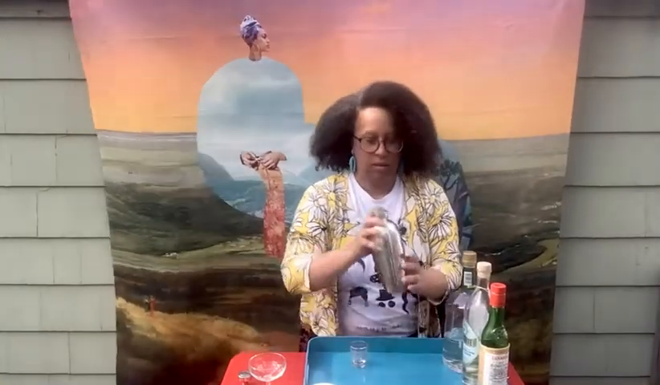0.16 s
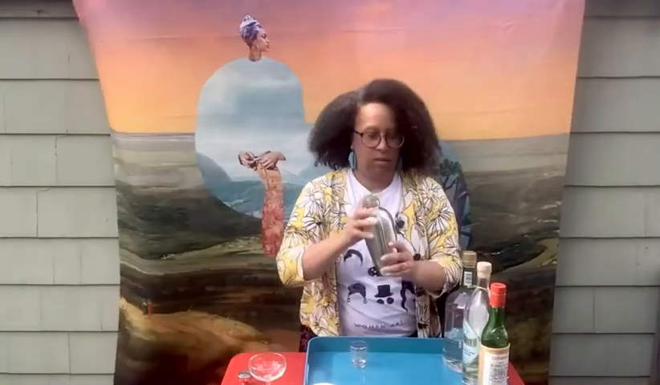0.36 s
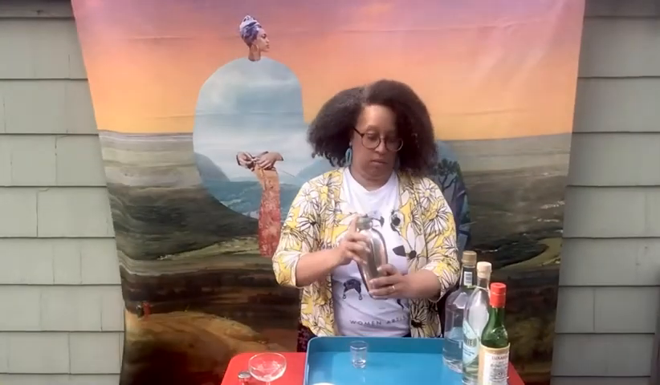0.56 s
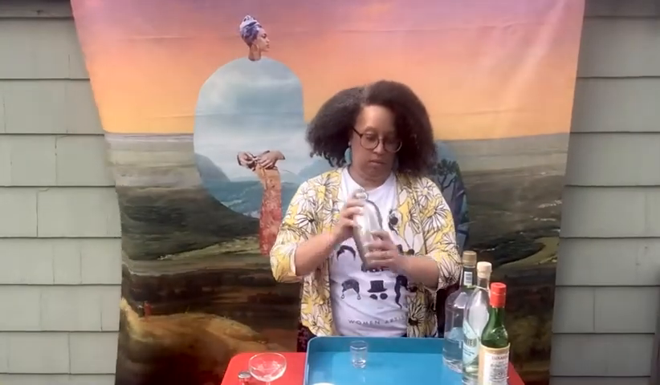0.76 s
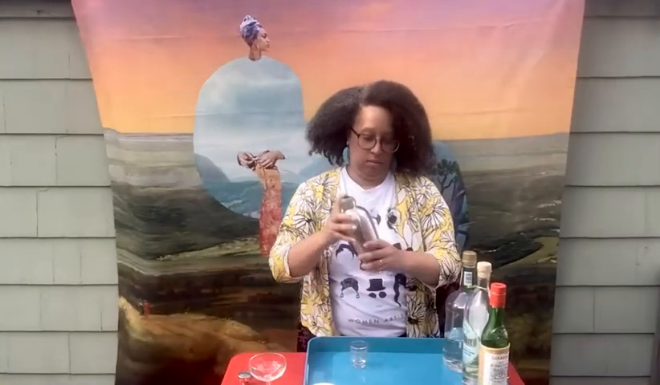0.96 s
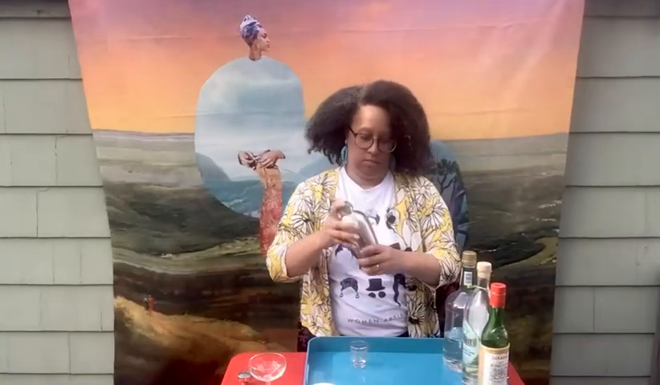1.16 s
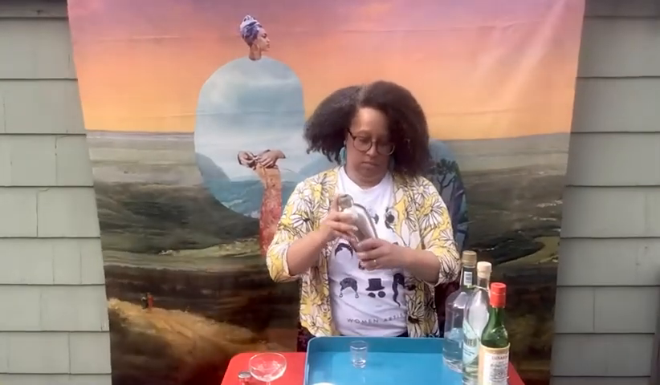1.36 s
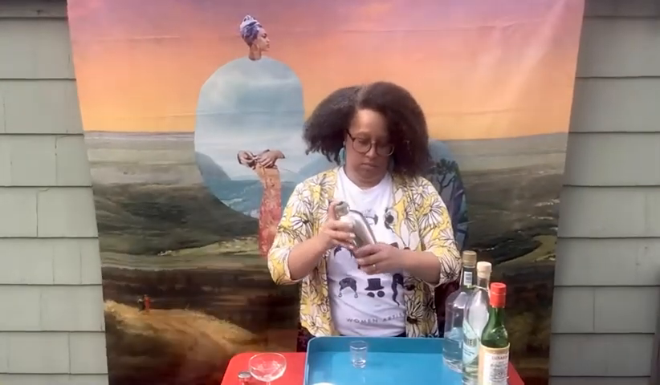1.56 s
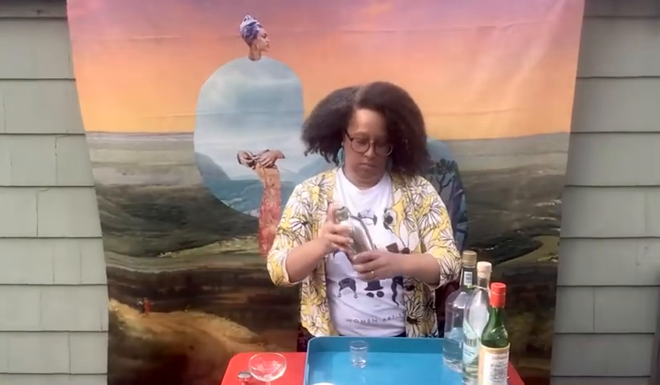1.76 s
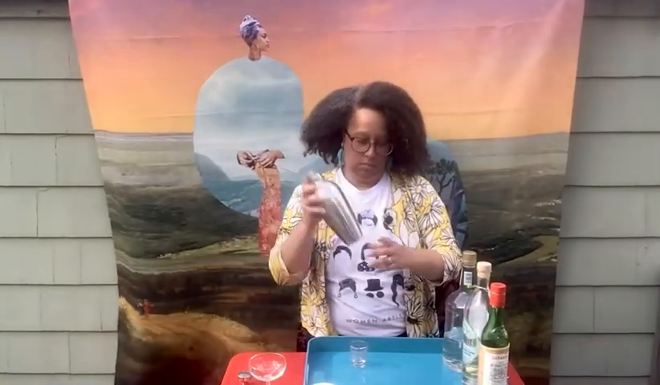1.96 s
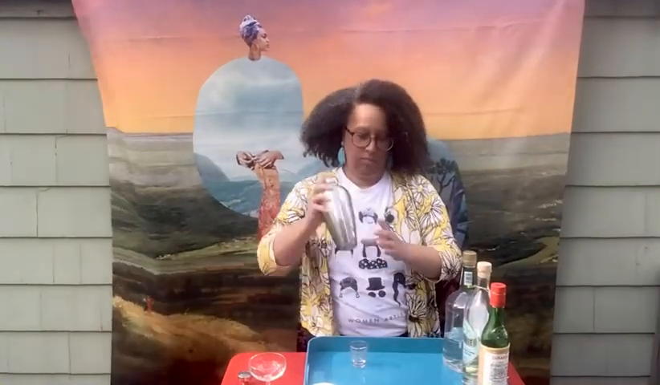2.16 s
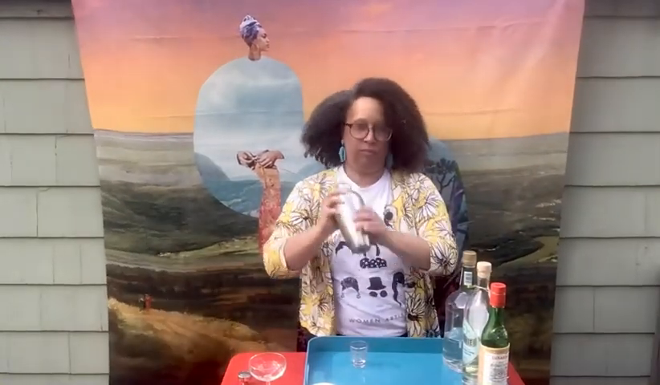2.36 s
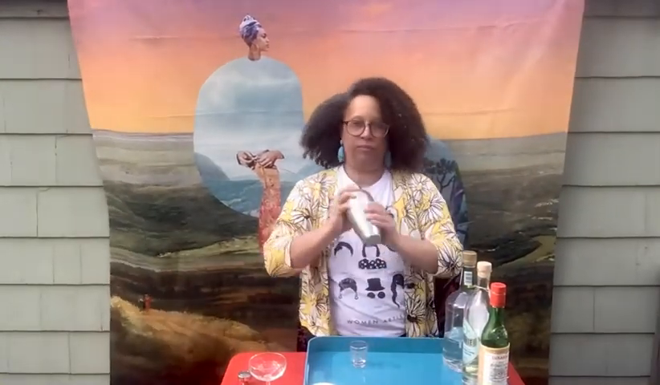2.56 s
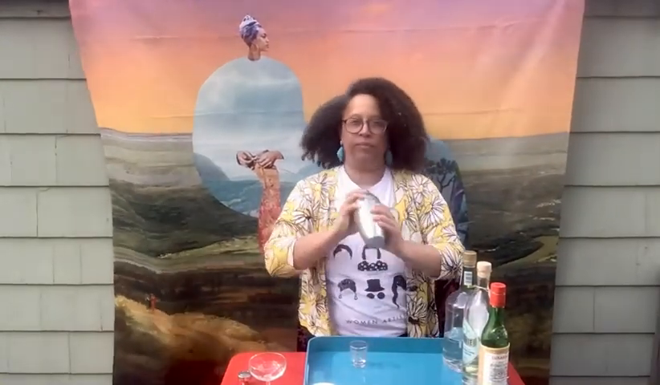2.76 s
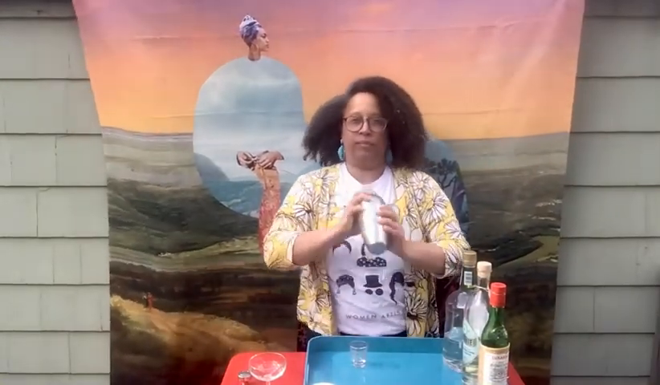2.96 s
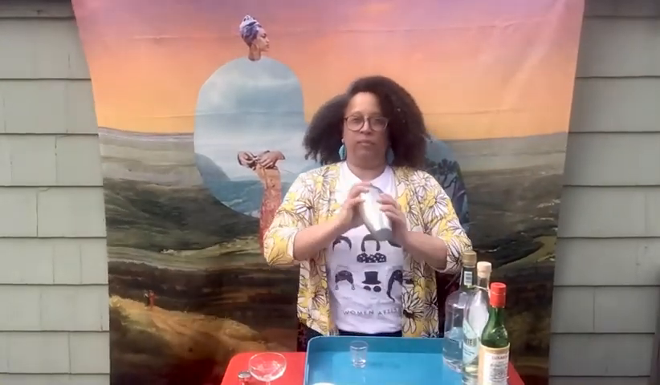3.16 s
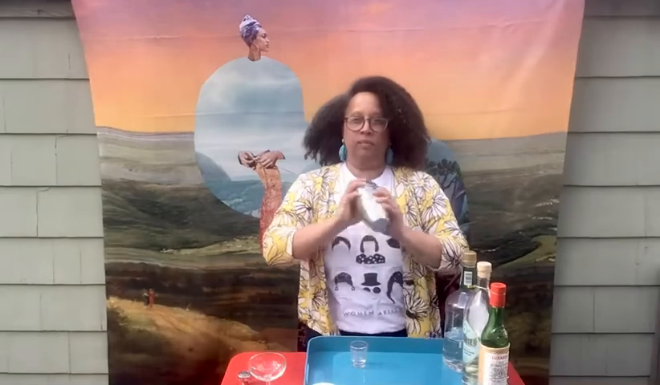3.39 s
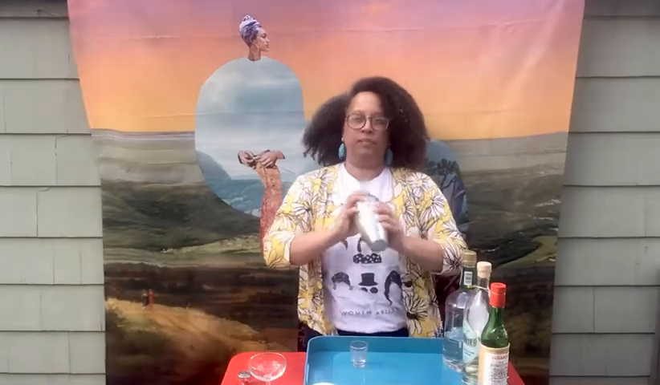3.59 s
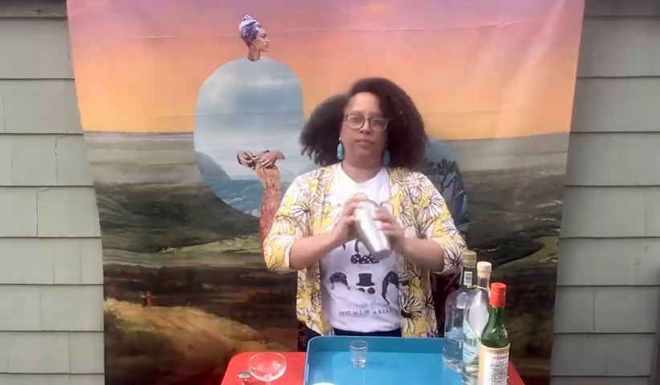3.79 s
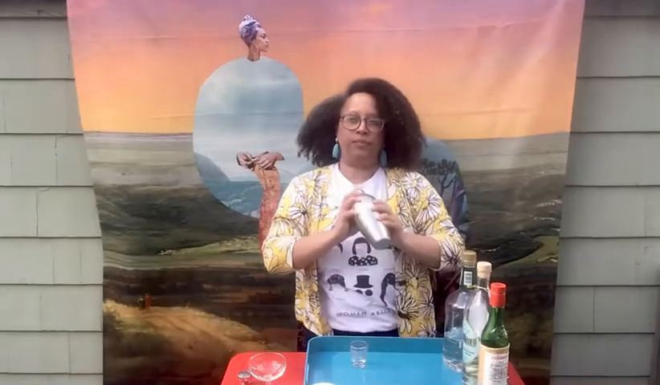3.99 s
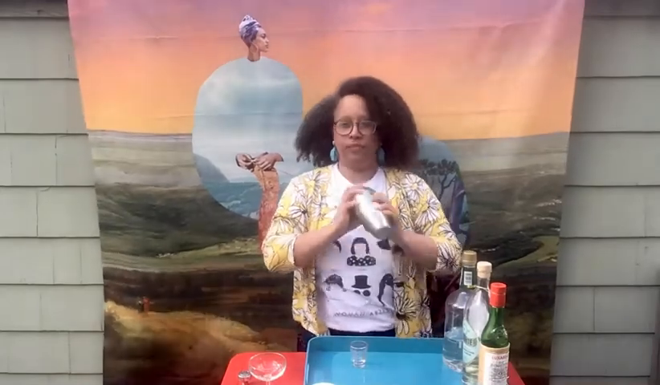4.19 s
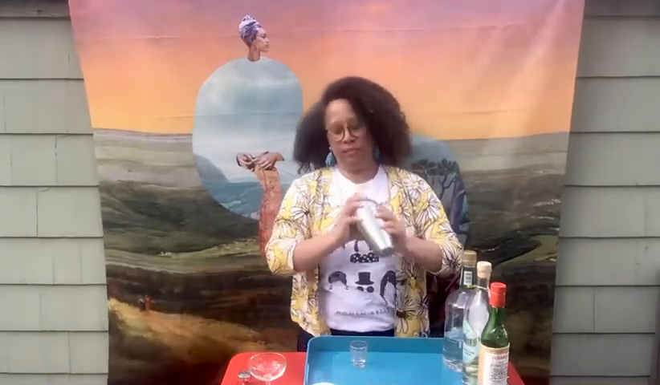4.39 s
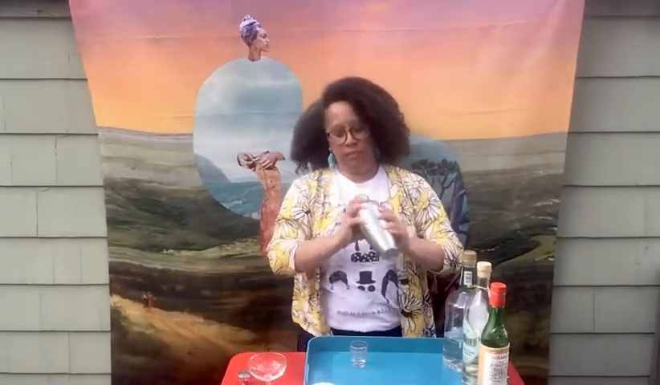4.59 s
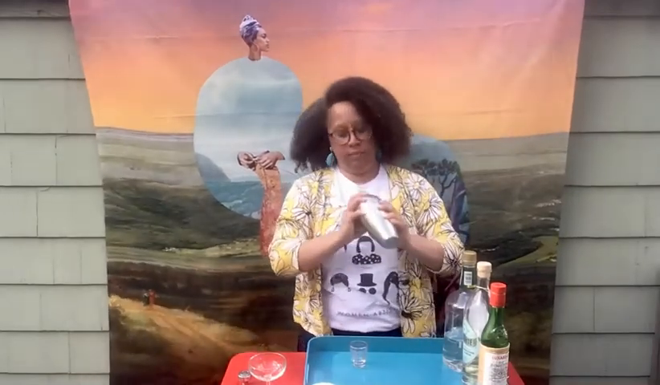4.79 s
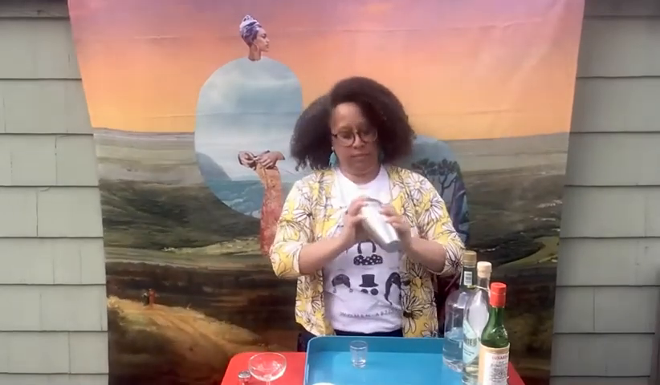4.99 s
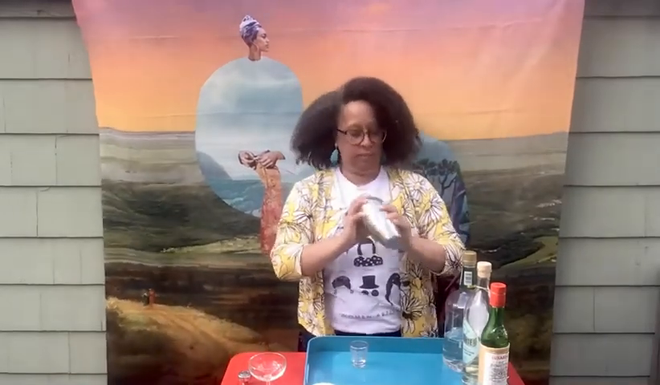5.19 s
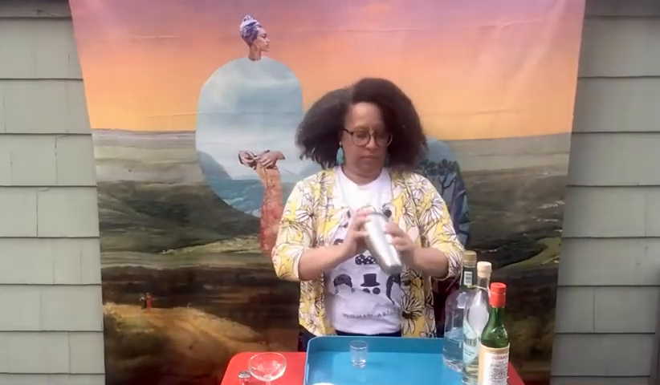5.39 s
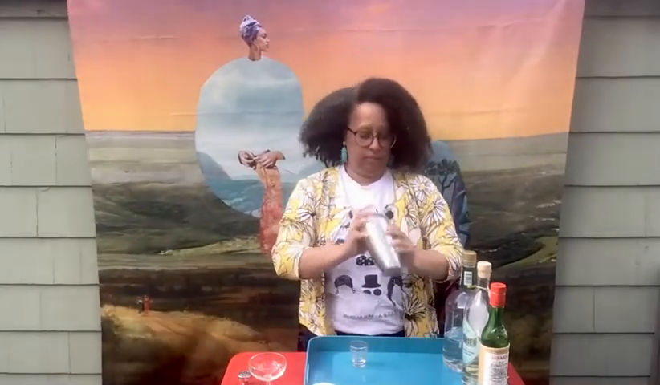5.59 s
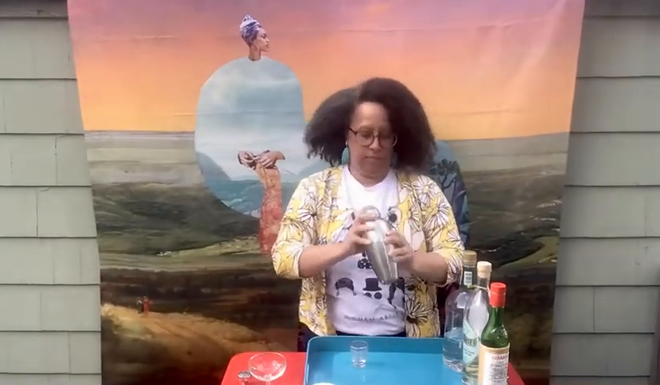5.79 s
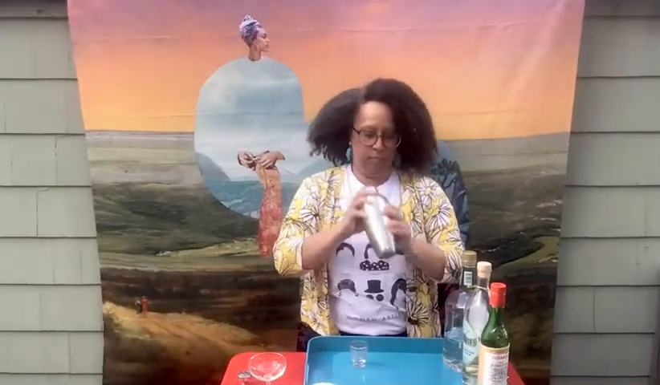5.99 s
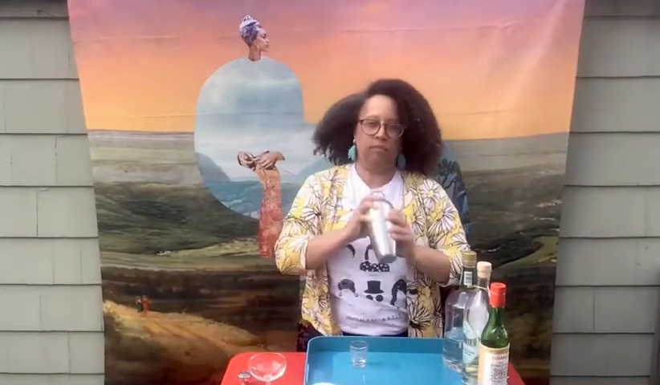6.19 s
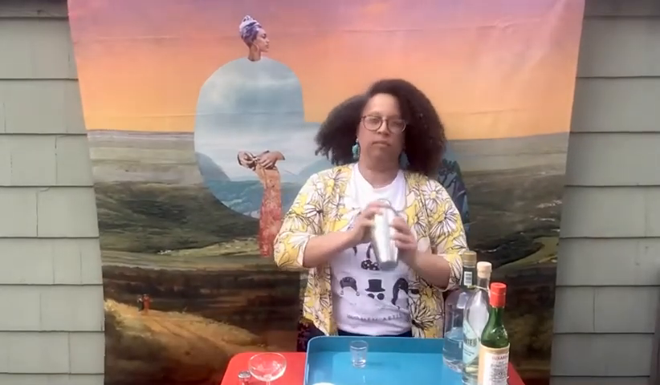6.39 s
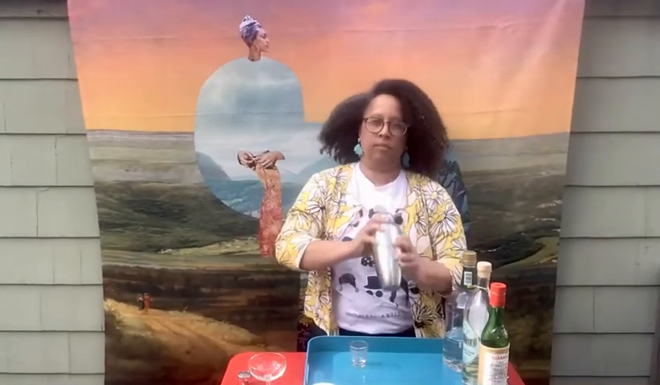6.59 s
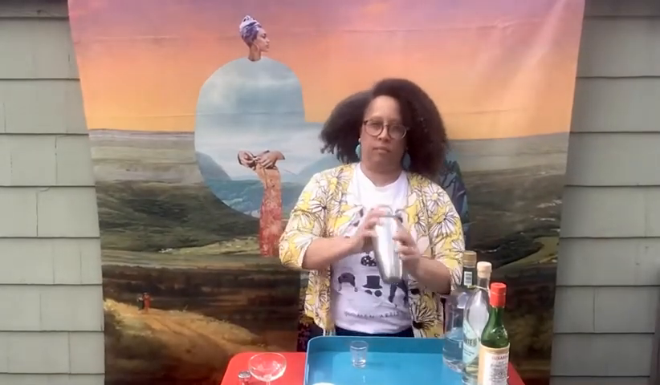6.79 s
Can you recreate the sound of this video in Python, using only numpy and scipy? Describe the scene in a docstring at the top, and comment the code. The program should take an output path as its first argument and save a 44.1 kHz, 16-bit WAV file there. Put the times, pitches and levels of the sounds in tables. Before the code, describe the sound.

A quiet outdoor yard with low, distant traffic rumble, faint hums and a little wind. A small bird gives a thin, zigzag falling chirp at 0.15 s and again, weaker, at 1.5 s; a faint reedy call comes at 1.9 s. From 0.3 to 0.6 s ice cubes shift softly in a steel shaker, with dull clinks again from 0.8 to 1.05 s and tiny ones until 1.45 s. At about 2.03 s the shaking bursts in, first with a more ringing metal tone, one loud crack near 2.07 s, then settling by 2.4 s. Until the end near 7 s, ice flies end to end, five round trips a second: bright clattering landings alternate with duller, cupped ones, each with short damped ring, scattered bounces, thump and liquid hiss. Blows grow stronger, with piercing cracks around 4.5, 4.7, 6.4 and 6.8 s. Close, dry sound, slight wall reflection.

```python
"""Outdoors by a wall: ice cubes shift in a steel shaker, then are thrown end to end and back five times a second.
Each blow cracks, rings damped shell modes and the cube's own pitch, and sets off dying random bounces.
Each turn adds a swell of filtered clicks (clatter), a thump and a hiss of drink.
Behind: traffic rumble and hums from shaped noise, low wind, small birds as wavering sines."""
import sys
import numpy as np
from scipy import signal
from scipy.io import wavfile

SR = 44100
rng = np.random.default_rng(int(sys.argv[2]) if len(sys.argv) > 2 else 0)


def transcribe(signal):
    """Save signal, clipped to [-1, 1], as a 16-bit WAV file at the path in sys.argv[1]."""
    frames = np.atleast_2d(signal).T
    limited = np.clip(frames, -1, 1)
    pcm = np.round(limited * 32767).astype(np.int16)
    wavfile.write(sys.argv[1], SR, pcm)


N = 302085


def from_db(db):
    """Amplitude gain of a level in dB."""
    return 10 ** (np.asarray(db) / 20)


def rms_one(x):
    """Scale to rms 1."""
    return x / np.sqrt(np.mean(x ** 2) + 1e-20)


def filtered(x, order, hz, kind):
    """Butterworth filter: low, high or band."""
    return signal.sosfilt(signal.butter(order, hz, kind, fs=SR, output="sos"), x)


def drift(rate_hz):
    """Random wander of rms 1: noise through two one-pole lowpasses, made at SR / 40 and interpolated."""
    pole = np.exp(-2 * np.pi * rate_hz * 40 / SR)
    noise = rng.standard_normal(N // 40 + 2002)
    slow = signal.lfilter([1], [1, -2 * pole, pole * pole], noise)[2000:]   # settled part
    return np.interp(np.arange(N) / 40, np.arange(len(slow)), rms_one(slow))


def ring(clicks, hz, t60_s):
    """Two-pole resonator: a unit click starts a dying sine of height about 1."""
    radius = from_db(-60 / (t60_s * SR))
    angle = 2 * np.pi * hz / SR
    return signal.lfilter([0, np.sin(angle)], [1, -2 * radius * np.cos(angle), radius ** 2], clicks + 1e-18)


def fade(clicks, t60_s):
    """Envelope that jumps at each click and decays exponentially."""
    return signal.lfilter([1], [1, -from_db(-60 / (t60_s * SR))], clicks + 1e-18)


def grains(per_s, spread_db):
    """Random clicks of uneven size and sign; rms 1."""
    sizes = from_db(spread_db * np.minimum(rng.exponential(1, N), 4))
    signs = rng.choice([-1, 1], N)
    return rms_one(sizes * signs * (rng.random(N) < per_s / SR))


def banded(sources, spectrum, patchy_db, rate_hz):
    """Third-octave bands dealt in turn from two sources, each with its own level and flicker; rms 1."""
    edges_hz = 25 * 2 ** np.arange(0, 9.5, 1 / 3)
    hz, density_db = np.transpose(spectrum)
    out = 0
    for k, (low_hz, high_hz) in enumerate(zip(edges_hz, edges_hz[1:])):
        band = filtered(sources[k % 2], 2, [low_hz, high_hz], "band")
        level_db = np.interp(np.log(low_hz * high_hz) / 2, np.log(hz), density_db)
        out = out + band * from_db(level_db + patchy_db * drift(rate_hz))
    return rms_one(out)


# relative spectrum of the rumble: pitch_hz, density_db [dB per Hz]
RUMBLE_SPECTRUM = [(26, -34), (45, -3.5), (228, -7), (299, -12), (363, -25), (513, -18), (818, -22),
                   (1550, -26.5), (1840, -31.5), (2410, -32), (12500, -45), (16000, -51)]
# far machinery: pitch_hz, width_hz, level_db
HUMS = [(102.5, 13.4, -64.5), (236.4, 5, -66.5), (488, 3.4, -91), (384, 27, -68.5)]
RUMBLE_DB = -59.5


def outdoors():
    """Distant traffic as shaped noise with a faint flicker; slowly wavering hums as noise through resonators."""
    noises = rng.standard_normal((2, N))
    air = from_db(RUMBLE_DB) * banded(noises, RUMBLE_SPECTRUM, patchy_db=-0.5, rate_hz=9)
    for hz, width_hz, level_db in HUMS:
        hum = rms_one(ring(rng.standard_normal(N), hz, 1.64 / width_hz))
        air += from_db(level_db + 1.2 * drift(1.0)) * hum
    return air


# one low bump: centre_s, pitch_hz, half_length_s, peak_db
BUMP = (3.39, 68, .012, -41)
WIND_DB = -73.5


def wind():
    """Lumpy low gusts on the microphone as 42-75 Hz noise, and one short bump: a cosine in a bell envelope."""
    low = rms_one(filtered(rng.standard_normal(N), 2, [42, 75], "band"))
    centre_s, hz, half_length_s, peak_db = BUMP
    after_s = np.arange(N) / SR - centre_s
    bump = from_db(peak_db) * np.exp(-(after_s / half_length_s) ** 2) * np.cos(2 * np.pi * hz * after_s)
    return from_db(WIND_DB + 3.2 * drift(5.6)) * low + bump


def bird(call, overtones_db, warble):
    """Harmonics on a pitch curve with a quick random waver in pitch and level, softly started and stopped."""
    s, hz, level_db = np.transpose(call)
    t = np.arange(N) / SR
    pitch_hz = np.interp(t, s, hz) * (1 + warble * drift(88.7))
    phase = 2 * np.pi * np.cumsum(pitch_hz) / SR
    edge = np.clip(np.minimum(t - s[0], s[-1] - t) / 0.0072, 0, 1)
    tone = sum(from_db(db) * np.sin((k + 1) * phase) for k, db in enumerate(overtones_db))
    return np.sqrt(2) * tone * edge * from_db(np.interp(t, s, level_db) + 4 * drift(150))


# zigzag falling chirp: after_start_s, pitch_hz
CHIRP_PITCH = [(0, 3500), (.019, 4800), (.033, 3700), (.04, 4150), (.048, 3100), (.058, 3400), (.085, 3250),
               (.1, 2800), (.122, 2900)]
CHIRP_DB, CHIRP_SWELL_DB, CHIRP_LOUDEST_S, CHIRP_HALF_S = -67, 7, 0.063, .065


def chirp(start_s, offset_db):
    """Time, pitch and level curve of one chirp, swelling towards its middle."""
    s, hz = np.transpose(CHIRP_PITCH)
    below_peak_db = CHIRP_SWELL_DB * ((s - CHIRP_LOUDEST_S) / CHIRP_HALF_S) ** 2
    return np.transpose([start_s + s, hz, offset_db + CHIRP_DB - below_peak_db])


# chirps: start_s, offset_db
CHIRPS = [(0.147, 0), (1.505, -2.5)]
# thin note before each chirp: after_chirp_start_s, pitch_hz, level_db
LEAD_IN = [(-.017, 5650, -82), (-.008, 5750, -76), (0, 5700, -82)]
# fainter reedy call: time_s, pitch_hz, level_db
REEDY = [(1.85, 2450, -86), (1.9, 2300, -74), (1.98, 2240, -90)]
# harmonics of the reedy call, fundamental first: level_db
REEDY_OVERTONES_DB = [-2, -3, -11]
# smear of the far calls: lag_s, level_db
YARD_ECHOES = [(.011, -10), (.023, -13), (.037, -17)]


def birds():
    """Chirps with lead-in notes and one reedy call, smeared by yard echoes."""
    calls = bird(REEDY, REEDY_OVERTONES_DB, warble=.025)
    for start_s, offset_db in CHIRPS:
        calls += bird(np.add(LEAD_IN, [start_s, 0, offset_db]), [0], warble=.01)
        calls += bird(chirp(start_s, offset_db), [0], warble=0.03)
    return calls + sum(from_db(db) * np.roll(calls, round(lag_s * SR)) for lag_s, db in YARD_ECHOES)


# distinct blows of ice on steel, before the mix gain:
# start_s, peak_db, brightness_db [relative to the peak], cube_pitch_hz
BLOWS = [(0.313, -41, -7, 2560), (0.358, -42, -22, 2040), (.38, -35.5, -24, 2230), (.428, -53, 2, 6100),
         (0.445, -40, -3, 6900), (.477, -47, -8, 2260), (0.489, -43, -7, 2080), (.548, -44, -13, 4530),
         (.564, -37.5, -5.5, 2580), (.825, -36.5, -12, 1640), (.867, -40, -25, 1930), (.94, -39, -19, 2310),
         (.973, -31, -9, 2180), (1.039, -43, -18, 2270), (1.23, -58, 0.5, 3970), (1.282, -48, -17, 1990),
         (1.452, -49.5, -7, 1630), (2.03, -35, 4, 5930), (2.043, -32, -3, 2410), (2.067, -17, -10, 5700),
         (2.093, -24, 7.5, 2500), (2.196, -23, -19, 2300), (2.212, -27, 4, 6800), (2.292, -49, 4, 6800),
         (2.3744, -21.5, -19, 2510), (2.446, -21, -6.5, 2220), (2.479, -23.5, -1, 3640),
         (2.611, -25, -9, 2920), (2.627, -26.5, -1.5, 3380), (2.682, -19, -5, 3035),
         (2.803, -26.5, -16, 1730), (2.813, -21.5, -21, 2030), (2.898, -22.5, 0, 3850),
         (3.016, -20.5, -0.5, 2460), (3.053, -34, -1, 2730), (3.097, -31.5, 4, 1827),
         (3.216, -23.5, -33, 2900), (3.294, -18, -26, 6600), (3.412, -20.5, -32, 2860),
         (3.462, -27, -12, 6240), (3.479, -31.5, 8, 1710), (3.503, -14.5, 0.5, 3200),
         (3.609, -19.5, -20, 2590), (3.633, -29, -9, 3710), (3.659, -31, -7, 2960),
         (3.676, -23, -5.5, 2270), (3.707, -13.5, -1.5, 3470), (3.812, -18, -30, 2580),
         (3.85, -26.5, -2.5, 3360), (3.878, -32, -11, 1820), (3.998, -25.5, -28, 2600),
         (4.085, -22, -6, 2830), (4.196, -20.5, -26, 2450), (4.208, -33.5, 3.5, 2360),
         (4.233, -24.5, -3, 5930), (4.275, -21.5, -13, 4670), (4.298, -20, -17, 2010),
         (4.392, -30, -11, 1980), (4.418, -19, -30, 2630), (4.462, -26, -1.5, 1450), (4.495, -11, -7, 5750),
         (4.61, -28, -19, 2280), (4.63, -27, -12, 2300), (4.698, -11.5, -2.5, 7020),
         (4.81, -21.5, -33, 2450), (4.837, -26, -6, 3100), (4.891, -26, -7, 2260), (4.904, -23.5, -1, 6770),
         (4.984, -33, -12, 7100), (4.997, -17.5, -28, 2510), (5.041, -31.5, -4, 3964),
         (5.062, -25, -1, 2730), (5.111, -26, 1.5, 6700), (5.213, -17, -16, 2700), (5.268, -38, -15, 6700),
         (5.2916, -24, 5.5, 5040), (5.4, -18.5, -31, 2560), (5.454, -28, -7, 3280),
         (5.489, -25.5, -23, 1900), (5.5942, -19, -23, 2460), (5.692, -17.5, -3, 3500),
         (5.802, -28.5, -20, 1570), (5.839, -31, -16, 2430), (5.881, -32, -22, 6700),
         (5.912, -26.5, -20, 1480), (5.946, -28, -8, 3070), (6.068, -25.5, -5.5, 3050),
         (6.088, -13.5, -12.5, 2550), (6.156, -28, -9, 5500), (6.17, -26, -2, 3860), (6.25, -29, -6, 2960),
         (6.282, -19.5, -23, 2920), (6.314, -27.5, -18, 3060), (6.353, -22.5, -6, 4040),
         (6.372, -9.5, -8, 3020), (6.507, -23, -30, 2750), (6.571, -35, 3, 3320),
         (6.597, -21.5, -1.5, 2820), (6.75, -25.5, -7, 2660), (6.798, -9, -4.5, 7650),
         (6.816, -17.5, 1.5, 3510)]
# low knock relative to the peak; when swung it grows more slowly than the peak
KNOCK_DB, KNOCK_FOLLOWS, KNOCK_AT_REST_DB, KNOCK_SPREAD_DB = -14.5, 0.45, -15, 2.5
USUAL_PEAK_DB = -24
# stray cube after each throw to the cupped end
STRAY_DB, STRAY_SPREAD_DB, STRAY_BRIGHT_DB, STRAY_HZ = -34, 2.5, -6, 3200
STRAY_LAG_S, STRAY_SCATTER_S = .042, .01


def all_blows():
    """Distinct blows and randomly scattered strays, with knock levels relative to their peaks."""
    cupped_s = np.array(THROWS)[::2, 0]
    luck = rng.standard_normal((4, len(cupped_s)))
    stray_s = cupped_s + STRAY_LAG_S + STRAY_SCATTER_S * luck[0]
    stray_db = STRAY_DB + STRAY_SPREAD_DB * luck[1]
    stray_bright_db = STRAY_BRIGHT_DB + 4 * luck[2]
    stray_hz = STRAY_HZ * np.exp(0.314 * luck[3])
    strays = np.transpose([stray_s, stray_db, stray_bright_db, stray_hz])
    s, peak_db, bright_db, cube_hz = np.vstack([strays, BLOWS]).T
    swung_db = KNOCK_DB + (KNOCK_FOLLOWS - 1) * (peak_db - USUAL_PEAK_DB)
    knock_db = np.where(s < 2, KNOCK_AT_REST_DB, swung_db) + KNOCK_SPREAD_DB * rng.standard_normal(len(s))
    return s, peak_db, knock_db, bright_db, cube_hz


# centres of the five colours of a blow (thud, knock, peak, bright, air): pitch_hz
COLOUR_HZ = [400, 1200, 3000, 6500, 13000]
# modes of the damped shell: pitch_hz, level_db [relative], t60_s
SHELL = [(255, -14, 0.045), (626, -8, 0.048), (1172, 1, 0.026), (1440, 4.5, 0.0059), (1876, -3.5, 0.011),
         (2220, -19.5, 0.014), (2450, -21, .07), (2650, -24, .11), (2820, -20, .05), (2960, -22, .09),
         (3570, -14.5, 0.012), (3986, 0.5, 0.0061), (6510, 2, 0.0071), (7180, -9, 0.034), (9300, -26, 0.06)]
# one hand alone damps the shell less: time_s, extra_db [middle modes]
LOOSE_GRIP = [(2.03, 16), (2.12, 11), (2.35, 0)]
THUD_DB, AIR_DB = -1, -1   # thud relative to knock, air relative to bright
SNAP_DB, SNAP_AIR_DB = 9, -8   # first snap; its cut in the top band
BOUNCE_SPREAD_DB = 4.2
NEAR_DB = 12   # boost of shell modes near the cube's pitch
CUBE_AT_REST_DB = -7   # a cube that only shifts rings less


def ice(spread_db, crack_db, crack_t60_s, cube_db, cube_cycles, bounce_db, bounce_t60_s):
    """Every blow cracks, rings briefly at the cube's own pitch and strikes the shell; small bounces follow."""
    s, peak_db, knock_db, bright_db, cube_hz = all_blows()
    at = np.minimum((s * SR).astype(int), N - 1)
    colours_db = peak_db + np.array([knock_db + THUD_DB, knock_db, 0 * s, bright_db, bright_db + AIR_DB])
    luck = rng.standard_normal((len(s), len(SHELL)))
    bounces = from_db(bounce_db) * np.array([grains(2000, BOUNCE_SPREAD_DB), grains(1800, BOUNCE_SPREAD_DB)])
    white = rng.standard_normal(N)
    place = np.arange(len(COLOUR_HZ))
    loose_db = np.interp(s, *np.transpose(LOOSE_GRIP), left=0)
    out = np.zeros(N)

    for k, (hz, level_db, t60_s) in enumerate(SHELL):
        mode_place = np.interp(np.log(hz), np.log(COLOUR_HZ), place)
        weights = np.clip(1 - abs(mode_place - place), 0, 1)   # between neighbouring colours
        near_db = NEAR_DB * np.exp(-(np.log(hz / cube_hz) / 0.025) ** 2)
        grip_db = loose_db * (k in (6, 7))
        blows = np.zeros(N)
        blows[at] = from_db(weights @ colours_db + level_db + spread_db * luck[:, k] + grip_db + near_db)
        out += ring(blows * (-1) ** k, hz, t60_s)

    for start, db, hz in zip(at, peak_db, cube_hz):
        click = signal.unit_impulse(min(SR // 10, N - start))
        span = slice(start, start + len(click))
        struck = click + fade(click, bounce_t60_s) * bounces[0, span]
        rest_db = CUBE_AT_REST_DB if start < 2 * SR else 0
        out[span] += from_db(db + cube_db + rest_db) * ring(struck, hz, cube_cycles / hz)

    edges_hz = [250, 700, 2000, 4500, 9000, 14500]
    for k, (low_hz, high_hz, colour_db) in enumerate(zip(edges_hz, edges_hz[1:], colours_db)):
        blows = np.zeros(N)
        blows[at] = from_db(colour_db)
        crack = from_db(crack_db) * fade(blows, crack_t60_s) * white
        clatter = fade(blows, bounce_t60_s) * bounces[k % 2]
        snap = from_db(SNAP_DB + SNAP_AIR_DB * (k == 4)) * blows
        band = filtered(crack + clatter + snap, 2, [low_hz, high_hz], "band")
        out += band * np.sqrt(SR / 2 / (high_hz - low_hz))   # unit noise stays near rms 1
    return out


# landings of ice and drink, cupped and bare end alternately, before the mix gain:
# peak_s, clatter_db, thump_db
THROWS = [(2.089, -36.5, -69), (2.202, -38, -35), (2.389, -43, -46), (2.483, -42.5, -51), (2.631, -41, -62),
          (2.7, -36.5, -38), (2.817, -46.5, -42), (2.903, -37, -32), (3.02, -39, -57), (3.114, -38.5, -47),
          (3.223, -44.5, -50), (3.304, -33.5, -45), (3.424, -41.5, -39), (3.517, -35.5, -56),
          (3.617, -43, -33), (3.714, -43.5, -38.5), (3.817, -42, -44.5), (3.901, -40, -46),
          (4.015, -46.5, -40), (4.092, -34.5, -40), (4.206, -39.5, -36), (4.313, -32, -34.5),
          (4.428, -47.5, -43), (4.505, -35, -53), (4.618, -40, -45), (4.708, -35.5, -42),
          (4.812, -43.5, -62), (4.902, -42, -50), (5.002, -37.5, -40), (5.109, -35, -45.5),
          (5.21, -38, -44), (5.293, -35, -44), (5.407, -39.5, -42), (5.503, -35.5, -57), (5.609, -38, -40),
          (5.707, -40.5, -38), (5.813, -49.5, -71), (5.926, -45.5, -41.5), (6.091, -42, -51),
          (6.174, -33, -68), (6.29, -43.5, -56), (6.388, -35.5, -51), (6.514, -40.5, -56),
          (6.599, -35.5, -39), (6.717, -39, -57), (6.806, -36, -66)]
# cupped end, bare end: rise_s, brightness_db [relative], t60_s
ENDS = [(.012, -7, .2), (.014, -3, 0.1)]
# relative spectrum of the clatter: pitch_hz, density_db [dB per Hz]
SLOSH_SPECTRUM = [(290, -5), (500, -1.5), (586, 0.5), (718, -3), (1720, -0.5), (2890, -4), (4940, -2),
                  (6510, 0), (15100, -25.5), (16000, -31)]
# drink running between turns; its treble relative to it
TRICKLE_DB, TRICKLE_BRIGHT_DB, SHAKING_FROM_S = -55, -2, 2.03
TIN_DB = -10   # shell ring under the clatter
SPRAY_DB, SPRAY_HZ, SPRAY_T60_S = -19.5, 7900, 0.4   # hiss of drink, relative to the bright clatter
# single clacks standing out of the clatter
TICKS_PER_S, TICK_DB, TICK_LOW_HZ, TICK_HIGH_HZ, TICK_CYCLES = 260, -3, 1400, 7500, 14


def throws():
    """At each turn the load lands: clatter swells and dies, the shell thumps and rings, drink hisses.
    The bare end answers brightly, the cupped end dully with more of the shell's middle ring."""
    t = np.arange(N) / SR
    dull = from_db(TRICKLE_DB) * (t > SHAKING_FROM_S)
    bright = dull * from_db(TRICKLE_BRIGHT_DB)
    thump, tin = np.zeros(N), np.zeros(N)
    for k, (peak_s, clatter_db, thump_db) in enumerate(THROWS):
        rise_s, bright_db, t60_s = ENDS[k % 2]
        near = slice(round((peak_s - .1) * SR), round((peak_s + 0.24) * SR))
        after_s = t[near] - peak_s
        shape_db = np.where(after_s < 0, -6 * abs(after_s / rise_s) ** 4, -60 * after_s / t60_s)
        dull[near] += from_db(clatter_db + shape_db)
        bright[near] += from_db(clatter_db + bright_db + 3.5 + shape_db)
        tin[near] += from_db(clatter_db - 0.94 * bright_db + TIN_DB + shape_db)
        thump[near] += from_db(thump_db + 2.65 * shape_db)   # shorter than the clatter

    rattle = banded([grains(1800, 3.0), grains(1800, 1.95)], SLOSH_SPECTRUM, patchy_db=4.0, rate_hz=23.5)
    low = filtered(rattle, 3, 4500, "low")
    high = filtered(rattle, 3, 4500, "high")

    knocks = grains(800, 3.96)
    tin_knocks = tin * from_db(np.interp(t, *np.transpose(LOOSE_GRIP))) * knocks
    middle = sum(ring(tin_knocks, hz, t60_s) * np.sqrt(1 / (t60_s * SR)) for hz, _, t60_s in SHELL[6:10])
    lowest_hz, _, lowest_t60_s = SHELL[0]
    body = rms_one(filtered(knocks, 2, [190, 720], "band"))
    body = body + from_db(-4) * rms_one(ring(knocks, lowest_hz, lowest_t60_s))

    hiss = rms_one(filtered(rng.standard_normal(N), 2, SPRAY_HZ, "high"))
    lingering = fade(bright, SPRAY_T60_S) * np.log(1000) / (SPRAY_T60_S * SR)   # decay of unit area
    spray = from_db(SPRAY_DB + 6.0 * drift(12)) * lingering * hiss

    clicks = grains(TICKS_PER_S, 4.6)
    cube = rng.integers(0, 9, N)   # each click rings two or three neighbouring pitches
    ticks = np.zeros(N)
    for k, hz in enumerate(np.geomspace(TICK_LOW_HZ, TICK_HIGH_HZ, num=9)):
        ticks += ring(clicks * (abs(cube - k) < 2), hz, TICK_CYCLES / hz) * np.sqrt(hz)
    ticks = from_db(TICK_DB) * bright * rms_one(ticks)
    return spray + ticks + dull * low + bright * high + middle + thump * rms_one(body)


def wall(x):
    """Direct sound plus dull echoes from the wall behind, the table and the ground."""
    dull = signal.lfilter([.6], [1, -.4], x)
    out = x.copy()
    for lag_s, level_db in [(.0035, -29), (.008, -27), (.014, -13)]:
        lag = round(lag_s * SR)
        out[lag:] += from_db(level_db) * dull[:N - lag]
    return out


def scene():
    """Shaker and birds with wall echoes, over rumble, hums and wind."""
    blows = ice(spread_db=4.5, crack_db=-17, crack_t60_s=0.015, cube_db=-2, cube_cycles=13.9,
                bounce_db=-16.5, bounce_t60_s=0.098)
    shaker = filtered(from_db(-7.0) * blows + from_db(-2.5) * throws(), 2, 170, "high")
    return (wall(shaker + birds()) + outdoors() + wind())[None]


MIC_TOP_HZ, CUTOFF_HZ = 14500, 16500


def record(dry):
    """Roll off the deep bass, soften the top, then cut it steeply."""
    dry = filtered(dry, 4, 40, "high")
    dry = filtered(dry, 2, MIC_TOP_HZ, "low")
    return signal.sosfilt(signal.cheby2(14, 60, CUTOFF_HZ, fs=SR, output="sos"), dry)


dry = scene()
out = record(dry)
transcribe(out)
```